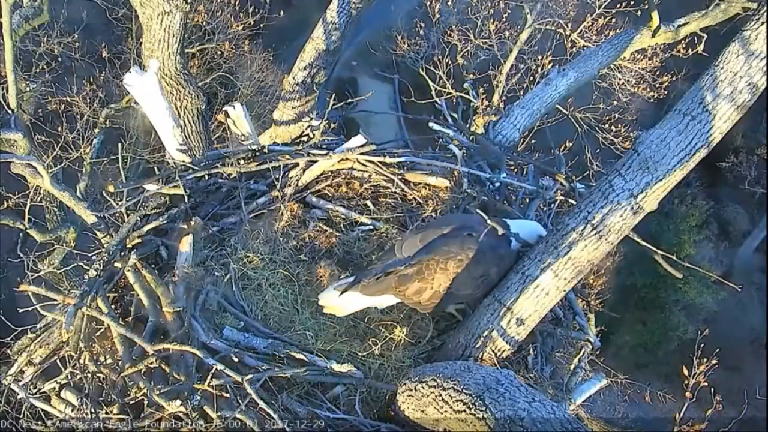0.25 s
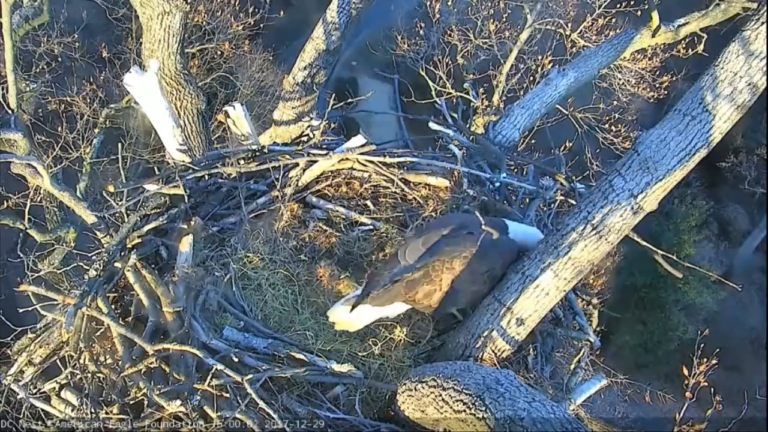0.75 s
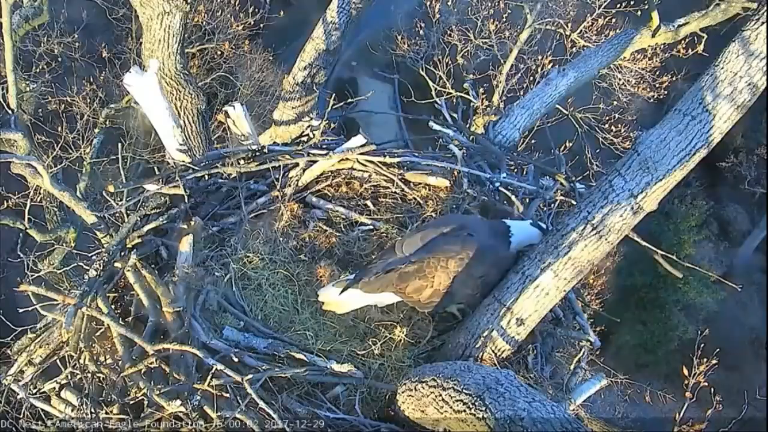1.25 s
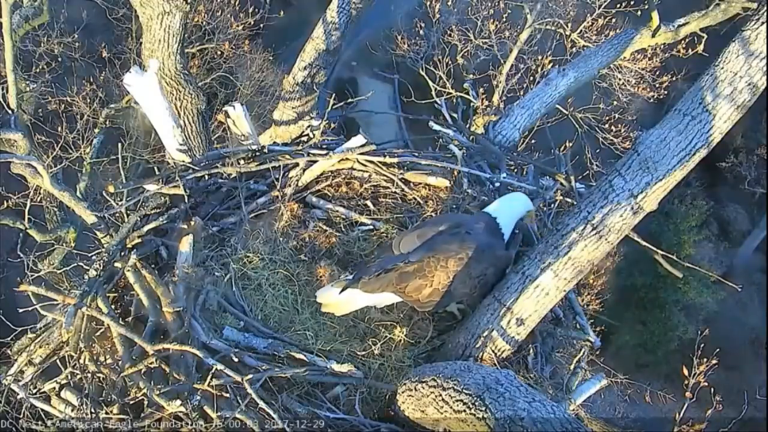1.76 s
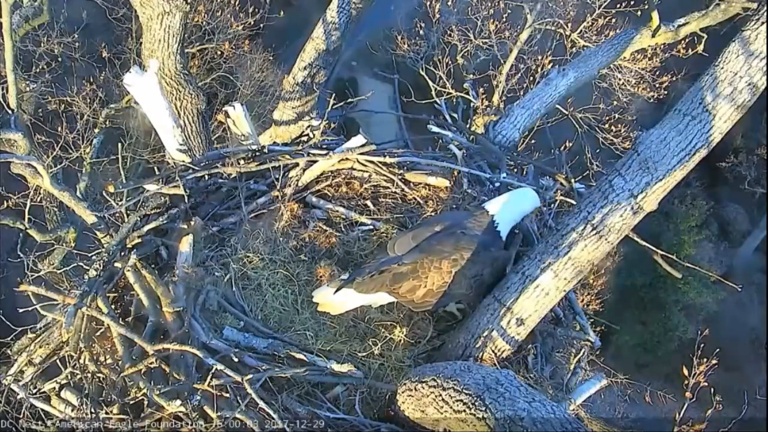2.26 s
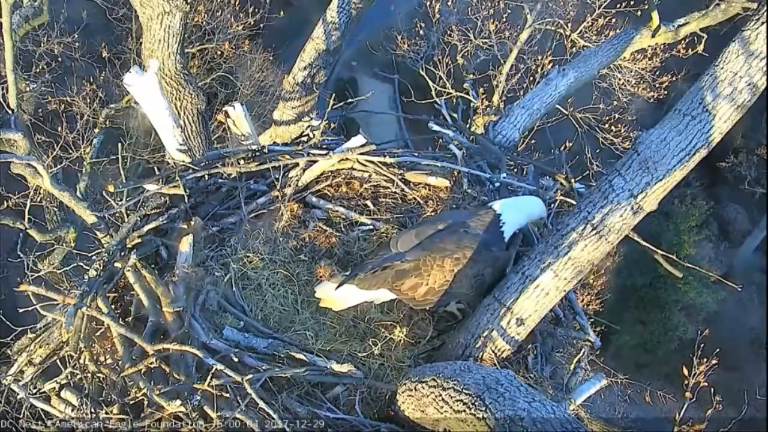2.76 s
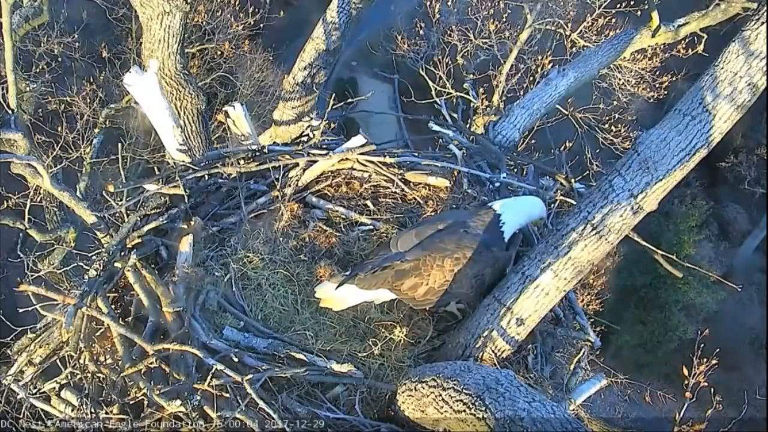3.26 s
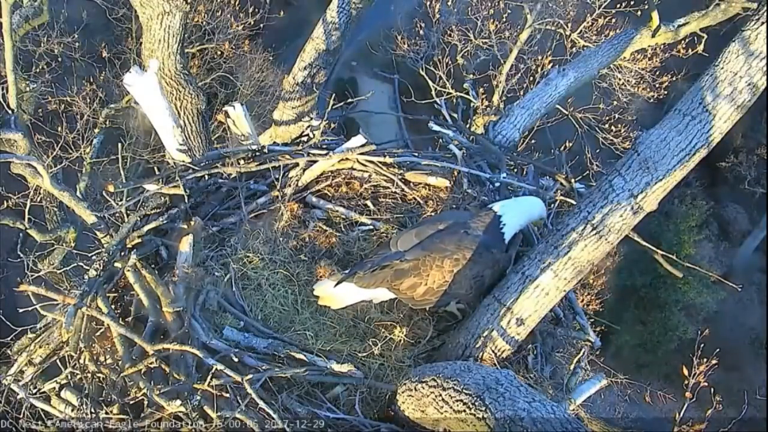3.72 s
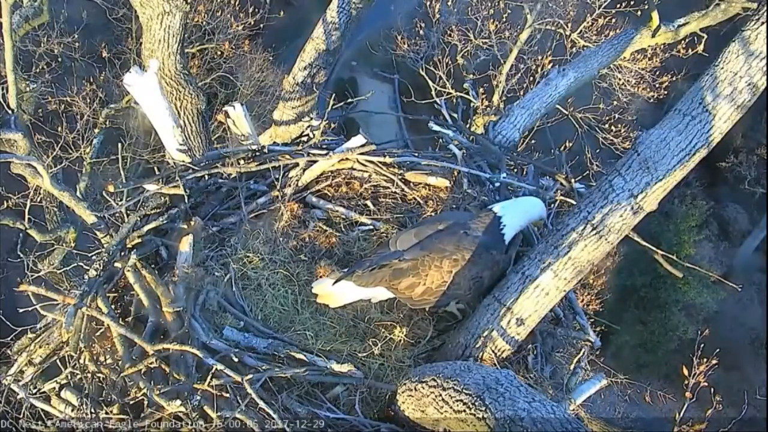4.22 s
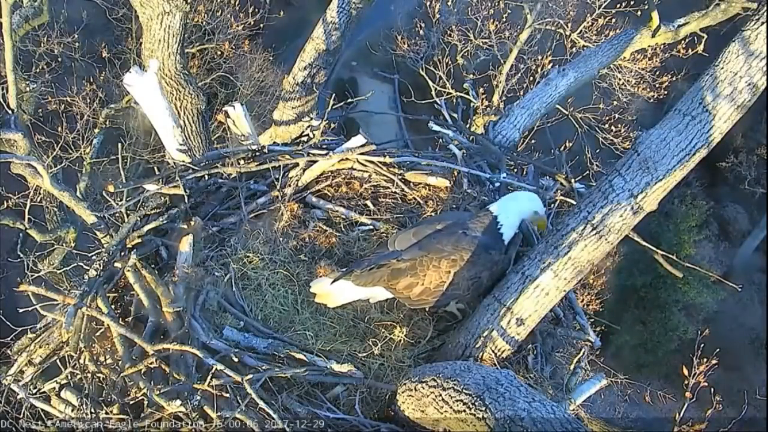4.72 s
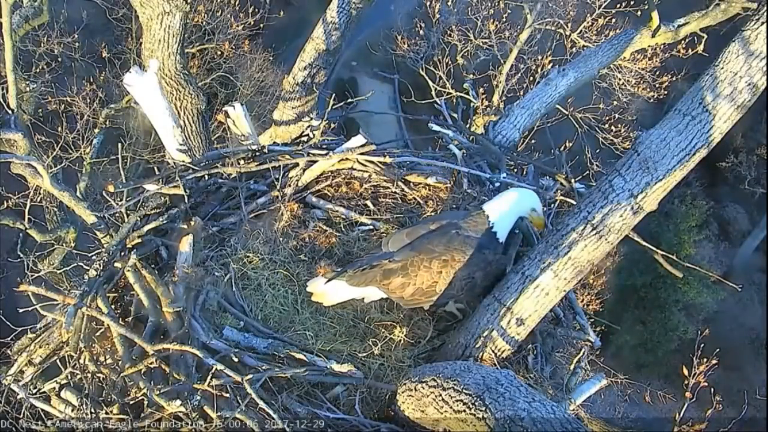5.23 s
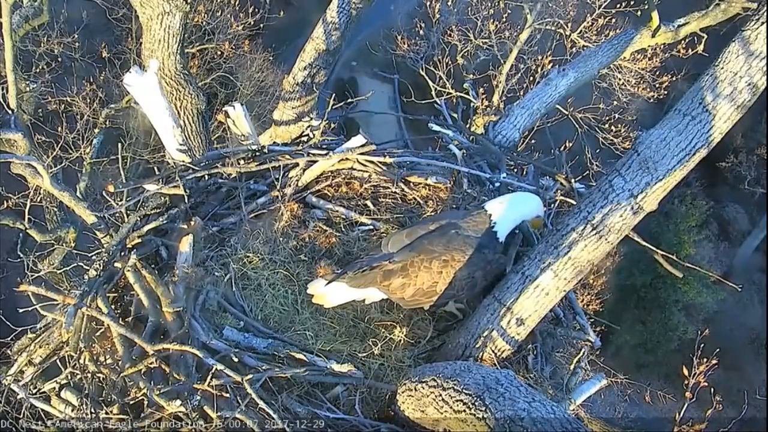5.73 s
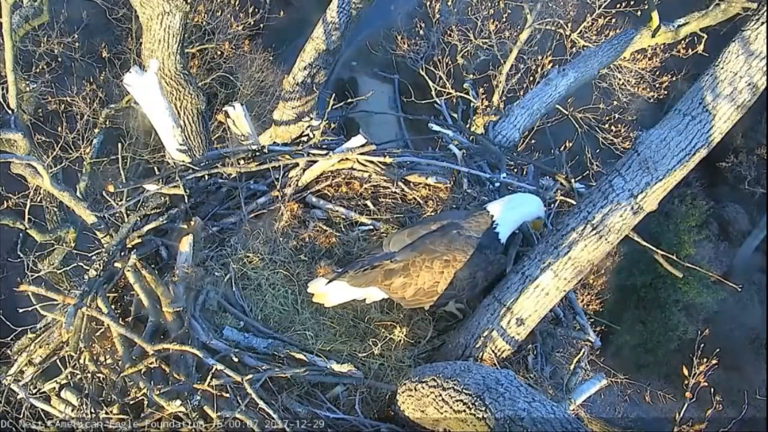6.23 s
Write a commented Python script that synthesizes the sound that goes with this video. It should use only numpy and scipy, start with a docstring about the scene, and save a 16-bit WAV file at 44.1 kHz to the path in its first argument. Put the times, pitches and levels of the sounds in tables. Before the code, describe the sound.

Outdoors high in a tree, a big bird tugs at nest material. Brittle cracks with dull woody thuds, tiny twig clicks and grainy grass rustles arrive in irregular spurts. After a busy opening there is a sparse middle, then the longest, densest crackle near four seconds, a sharp flurry at five, and lighter scattered snaps to the end. The close microphone's hollow casing gives a pinched midrange colour over faint distant rumble.

```python
"""Bird shifting sticks in a treetop nest

A large bird shifts dry sticks and grass, heard by one boxed microphone on a branch. Sticks snap and knock
as bursts of random cracks, thin twigs tick as very short tears, and grass rustles as dense tiny grains.
The hollow housing, a filter peaking near 2.7 kHz, colours snaps, ticks and rustle. Shaped noise and a
narrow hum make the low distant rumble."""
import sys
import numpy as np
from scipy import signal
from scipy.fft import rfft, irfft
from scipy.io import wavfile
from scipy.ndimage import uniform_filter1d

SR = 44100
rng = np.random.default_rng(int(sys.argv[2]) if len(sys.argv) > 2 else 0)


def generate_wav(sig):
    """Save sig (samples, or channels by samples) to the path in sys.argv[1] as 16-bit PCM at SR."""
    pcm = np.round(np.clip(np.atleast_2d(sig).T, -1, 1) * 32767).astype(np.int16)
    wavfile.write(sys.argv[1], SR, pcm)


N = 285768

# colour of the microphone box: (frequency [Hz], gain [dB])
HOUSING_RESPONSE = [(590, -57), (1000, -21.5), (1270, -17), (1480, -17.5), (1640, -22), (1900, -13),
                    (2190, -12), (2660, 3.5), (2830, -0.5), (4210, -17.5), (5310, -26), (7500, -34),
                    (9300, -42.5), (12100, -52.5)]


def undb(db):
    """Amplitude ratio from decibels."""
    return 10 ** (np.asarray(db) / 20)


def level(x, db):
    """Scale to an rms level."""
    return x * undb(db) / np.sqrt(np.mean(x ** 2))


def curves(table):
    """Columns of a table as sample-by-sample curves."""
    time_s, *columns = np.transpose(table)
    return [np.interp(np.arange(N) / SR, time_s, column) for column in columns]


def colour(x, points, size=2048):
    """Causal filter with the given (Hz, dB) shape, built from the cepstrum of the log gain."""
    hz, db = np.transpose(points)
    bins_hz = np.fft.rfftfreq(size, 1 / SR) + 1  # +1 avoids log(0)
    gain_db = np.interp(np.log(bins_hz), np.log(hz), db)
    cepstrum = irfft(np.log(undb(gain_db)))
    # fold onto positive time: minimum phase
    cepstrum[1:size // 2] *= 2
    cepstrum[size // 2 + 1:] = 0
    impulse = irfft(np.exp(rfft(cepstrum)))
    return signal.fftconvolve(x, impulse)[:len(x)]


def band(x, lo_hz, hi_hz):
    """Gentle band-pass."""
    return signal.sosfilt(signal.butter(2, [lo_hz, hi_hz], "band", fs=SR, output="sos"), x)


def split(x, edge_db, edge_hz=4200):
    """Raise or lower everything above the edge."""
    low = signal.sosfilt(signal.butter(1, edge_hz, fs=SR, output="sos"), x)
    return low + undb(edge_db) * (x - low)


def cracks(size, scatter_db):
    """Fibres giving way: noise whose grains scatter upward in level, large ones being rare."""
    boost_db = scatter_db * np.minimum(rng.exponential(size=size), 6)
    return level(rng.standard_normal(size) * undb(boost_db), 0)


def walk(rate_hz):
    """Random levels drawn at a rate and slewed from one to the next; spread just under 1."""
    step = int(SR / rate_hz)
    held = np.repeat(rng.standard_normal(N // step + 1), step)
    return uniform_filter1d(held, step)[:N]


def snaps():
    """Each snap is a brief burst of cracks that rings the stick and the housing and thuds in the boughs."""
    # stick snaps and knocks: (time [s], level [dB], stick pitch [Hz], stick ring [dB re housing ring],
    # thud [dB re snap], sharp edge [dB], burst length to -60 dB [s])
    snap_events = [(0.347, -34, 750, 9, -8.5, -15, 0.057), (0.507, -29.5, 1410, -7, -7, 5, 0.11),
                   (0.534, -38.5, 1410, -2, -4, 5, 0.23), (0.738, -39.5, 1470, 2, -23, -11, 0.043),
                   (0.818, -31, 1680, -3, -2, 9, 0.14), (0.89, -39.5, 918, -10, -24, -2, 0.097),
                   (1.333, -42, 2210, 14, -7, -3, 0.09), (1.352, -27, 2060, 1.5, -21, -11, 0.18),
                   (1.593, -29.5, 1930, -1, -13, 22, 0.065), (1.678, -38.5, 1980, -3, -14, 0, 0.11),
                   (1.815, -43, 1070, 2, -10, -10, 0.11), (2.453, -36.5, 1320, 2, -4.5, -21, 0.13),
                   (2.601, -42.5, 1010, -13, -28, 18, 0.035), (3.179, -39.5, 1850, -2, -8, -24, 0.16),
                   (3.31, -37, 1980, -7, -14, -6, 0.08), (3.341, -34, 1920, -7, -21, 8, 0.076),
                   (3.854, -26.5, 1880, -4, -26, -7, 0.063), (4.0182, -30.5, 2000, -11, -20, 2, 0.091),
                   (4.999, -36.5, 1230, -12, -7.5, -10, 0.076), (5.074, -29, 1890, -29, -20, 14, 0.086),
                   (5.467, -35.5, 1950, -25, -17, -2, 0.13), (5.7, -41, 780, -26, -11, 17, 0.084),
                   (5.758, -34.5, 1980, -17, -31, 5, 0.041), (5.863, -32.5, 759, -30, -17, -2, 0.1),
                   (6.041, -33, 1850, -14.5, -18, 12, 0.065)]
    # modes of the boughs under the nest: (frequency [Hz], width [Hz], relative level [dB])
    bough_modes = [(261, 52, -9.5), (481, 76, 2.5), (736, 87, -3), (870, 310, -3.5)]
    out = np.zeros(N + SR)
    t = np.arange(SR // 4) / SR
    slips = undb(2.0 * walk(280))  # tearing goes in jerks a few ms long
    for start_s, db, hz, stick_db, thud_db, edge_db, length_s in snap_events:
        i = int(start_s * SR)
        tearing = (1 - np.exp(-t / 0.0014)) * undb(-60 * (t / length_s) ** 1.12)
        jerks = np.roll(slips, -i)[:len(t)]
        burst = cracks(len(t), scatter_db=3.5) * tearing * jerks

        ring = colour(split(burst, edge_db), HOUSING_RESPONSE)
        lo_hz, hi_hz = hz / 1.18, hz * 1.23
        stick = band(band(burst, lo_hz, hi_hz), lo_hz, hi_hz)
        bright = level(ring, 0) + level(stick, stick_db)
        # peaks stand some dB over the running level
        bright = level(bright, -10.5) * np.sqrt(np.mean(tearing ** 2)) / tearing.max()

        # the heavy nest answers late and lingers
        shake = rng.standard_normal(len(t)) * t * np.exp(-t / 0.0082)
        thud = sum(level(band(shake, mode_hz - width_hz / 2, mode_hz + width_hz / 2), mode_db)
                   for mode_hz, width_hz, mode_db in bough_modes)
        thud /= np.abs(thud).max()
        out[i:i + len(t)] += undb(db) * (bright + undb(thud_db) * thud)
    return out[:N]


def ticks():
    """A very short tear rings a thin twig at its own pitch and clicks in the housing."""
    # thin twigs flicking free: (time [s], peak [dB], twig pitch [Hz], click [dB re twig])
    tick_events = [(0.039, -43.5, 3000, 5), (0.0617, -42, 3250, 5), (0.071, -37.5, 3400, -3),
                   (0.146, -45.5, 3550, -1), (0.257, -41, 2920, 8), (0.359, -42, 2830, -12),
                   (0.5096, -29, 3230, -7), (0.5136, -29, 2680, -14), (0.525, -34.5, 2550, -19),
                   (0.821, -30.5, 3510, -5), (0.822, -30, 3310, -18), (0.828, -29, 2600, -2),
                   (1.354, -32, 2060, 0.5), (1.371, -29.5, 2470, -6), (1.393, -31.5, 2530, -13),
                   (1.598, -34.5, 2680, -11), (1.871, -44.5, 2480, -13), (2.014, -47.5, 2500, -8),
                   (2.212, -48.5, 3470, 5), (2.229, -48, 2660, -1), (2.2477, -47, 2680, 14),
                   (2.4561, -32.5, 2470, -9), (2.462, -33, 1730, -12), (2.4662, -35.5, 1840, -8),
                   (2.572, -46.5, 2570, 1), (2.682, -52, 3550, 7), (2.755, -54.5, 2900, 0),
                   (2.799, -47.5, 2480, 3), (2.825, -49, 2600, 2), (3.188, -34, 2680, -22),
                   (3.3097, -39.5, 2730, -8), (3.343, -39.5, 2690, -14), (3.703, -57, 2930, 3),
                   (3.8465, -47, 3360, -5), (3.8573, -31, 2690, -19), (3.866, -26.5, 2850, -1),
                   (3.888, -33, 2720, -5), (3.902, -39, 2750, -10), (3.925, -30, 2630, -7),
                   (3.9424, -29, 2710, -9), (3.946, -32, 2700, -13), (4.026, -34.5, 2920, -3),
                   (4.047, -34, 2850, -14), (4.275, -39, 2770, -5), (5.005, -28.5, 2690, -22),
                   (5.023, -28.5, 2880, -16), (5.0266, -29, 2670, -16), (5.0768, -30.5, 2700, -1),
                   (5.226, -43, 2570, -5), (5.448, -45, 2750, -6), (5.476, -42, 2820, -3),
                   (5.567, -41, 2670, -9), (5.68, -46, 2700, -3), (5.847, -43, 2720, -5),
                   (5.955, -44.5, 2820, 4), (6.203, -42, 2640, -4), (6.262, -46, 2760, -3),
                   (6.378, -49, 2770, 0)]
    t60_s, tear_s, edge_db = 0.021, 0.0013, -9
    out = np.zeros(N + SR)
    t = np.arange(SR // 20) / SR
    for start_s, db, hz, click_db in tick_events:
        tear = rng.standard_normal(len(t)) * t * np.exp(-t / tear_s)
        ringing = np.sin(2 * np.pi * hz * t) * undb(-60 * t / t60_s)
        twig = np.convolve(tear, ringing)[:len(t)]
        click = colour(split(tear, edge_db), HOUSING_RESPONSE)
        tick = level(band(twig, hz / 2, hz * 2), 0) + level(click, click_db)
        i = int(start_s * SR)
        out[i:i + len(t)] += undb(db) * tick / np.abs(tick).max()
    return out[:N]


def layer_powers(bright_db, deep_db):
    """Relative powers of the fine, grass and twig layers, as a column."""
    return undb([[bright_db], [0], [deep_db]]) ** 2


def drags():
    """Gains of the three grain layers: every drag rises, holds and settles over the faint stirring."""
    # grass dragged, then settling: (start [s], level [dB], rise [s], hold [s], settling [dB/s],
    # brightness [dB re grass], depth [dB re grass])
    drag_events = [(0.0, -68.5, 0.0058, 0.029, 76, 21.5, 5), (0.171, -57.5, 0.062, 0.019, 83, 12, 7),
                   (0.353, -48.5, 0.006, 0.048, 108, 2.5, 5.5), (0.51, -57.5, 0.012, 0.12, 54, 4.5, 7.5),
                   (0.808, -58.5, 0.0081, 0.033, 76, 8.5, 8.5), (1.338, -49, 0.011, 0.053, 192, 8, 7.5),
                   (1.519, -61, 0.089, 0.016, 147, 14, 20), (1.67, -63, .01, 0.077, 28.5, 5, 11),
                   (2.009, -59, 0.0083, 0.029, 87, 0, -4), (2.359, -61, 0.011, 0.014, 148, 1.5, 12.5),
                   (2.452, -65, 0.0099, 0.026, 43.5, 11, 12), (3.288, -66, 0.012, 0.043, 58, 10.5, 6),
                   (3.853, -45.5, 0.0073, 0.17, 49.5, 9, 0), (4.161, -50.5, 0.091, 0.12, 62, 4, 1),
                   (4.534, -62, 0.065, 0.25, 39, 0.5, -15), (5.001, -48, 0.013, 0.07, 92, 9, 2),
                   (5.03, -45.5, 0.029, 0.042, 60, -13, 1.5), (5.441, -55.5, 0.0098, 0.027, 81, 7.5, -8),
                   (5.547, -49, 0.015, 0.0083, 223, 6.5, -10), (5.658, -59, 0.035, 0.016, 77, 7.5, -14),
                   (6.182, -62.5, 0.013, 0.022, 28, 2.5, -15)]
    # faint stirring of the grass between drags: (time [s], level [dB])
    stirring = [(0, -63), (1.0, -75.5), (1.25, -72), (1.45, -56), (2.0, -68.5), (2.9, -73.5), (3.8, -69),
                (5.3, -74.5), (5.6, -62.5), (6.1, -63.5), (6.48, -80)]
    t = np.arange(N) / SR
    power = layer_powers(bright_db=6.5, deep_db=-9.5) * undb(curves(stirring)[0]) ** 2
    for start_s, db, rise_s, hold_s, settle_db_per_s, bright_db, deep_db in drag_events:
        swell = np.clip((t - start_s) / rise_s, 0, 1)
        settling_s = np.maximum(t - start_s - rise_s - hold_s, 0)
        fall = undb(db - settle_db_per_s * settling_s)
        power = power + layer_powers(bright_db, deep_db) * (swell * fall) ** 2
    return np.sqrt(power)


def rustle():
    """Dense grains: fine stalks hiss, grass and thick twigs crackle in shared uneven spurts."""
    fine_gain, grass_gain, twigs_gain = drags()
    spurts = 1.4 * walk(22)
    fine = cracks(N, scatter_db=3.0) * undb(1.5 * walk(40))
    grass = cracks(N, scatter_db=0.0) * undb(spurts + 2.42 * walk(160))
    twigs = cracks(N, scatter_db=3.5) * undb(spurts + 2.1 * walk(80))
    # stalks crackle apart from the spurts, each with a short ring of its own pitch
    stalks = np.zeros(N)
    for hz in np.geomspace(2000, 5200, num=6):
        breaking = cracks(N, scatter_db=5.5) * undb(2 * walk(35))
        stalks += level(band(breaking, hz / 1.09, hz * 1.081), -18.5)
    mixed = grass_gain * (stalks + band(grass, 340, 4000))
    mixed += fine_gain * band(fine, 4670, 10000)
    mixed += twigs_gain * band(twigs, 1500, 2120)
    # referred to full-band grass through the housing
    return colour(mixed, HOUSING_RESPONSE) / np.std(colour(grass, HOUSING_RESPONSE))


def rumble():
    """Smooth low noise from far off, with a narrow wavering hum that comes and goes."""
    # noise spectrum: (frequency [Hz], relative density [dB])
    tone = [(18, -66.5), (30, -37), (48, -37), (92, -28.5), (180, -6), (265, 2), (482, -1), (709, -7.5),
            (816, -12.5), (1650, -31), (2000, -58.5), (2600, -45.5), (4400, -120)]
    # far rumble: (time [s], level [dB])
    rumble_level = [(0, -50.5), (.4, -50), (.58, -46.5), (.8, -50), (1.1, -53), (1.5, -51.5), (2.2, -53),
                    (3.9, -53), (4.5, -52), (6.48, -54)]
    # swells of the low hum: (centre [s], level [dB], half length [s])
    hum_swells = [(0.567, -58, 0.17), (0.862, -51.5, 0.088), (4.212, -59, 0.14), (4.76, -54.5, 0.15)]
    hum_rest_db = -70
    t = np.arange(N) / SR
    hum_gain = undb(hum_rest_db) + sum(undb(db) * np.exp(-((t - centre_s) / half_s) ** 2)
                                       for centre_s, db, half_s in hum_swells)
    broad = level(colour(rng.standard_normal(N), tone, size=8192), 0)
    hum = level(band(rng.standard_normal(N), 233.5, 263.6), 0)
    return undb(curves(rumble_level)[0]) * broad + hum_gain * hum


def scene():
    """One microphone feeds both channels."""
    mono = snaps() + ticks() + rustle() + rumble()
    return np.tile(mono, (2, 1))


def record(dry):
    """The loudest peaks are rounded, each channel adds its own faint circuit hiss, and the top is cut."""
    ceiling, hiss_db, top_hz = 0.058, -91, 9300
    rounded = ceiling * np.tanh(dry / ceiling)
    noisy = rounded + undb(hiss_db) * rng.standard_normal(dry.shape)
    return signal.sosfilt(signal.ellip(10, .2, 80, top_hz, fs=SR, output="sos"), noisy)


dry = scene()
out = record(dry)
generate_wav(out)
```